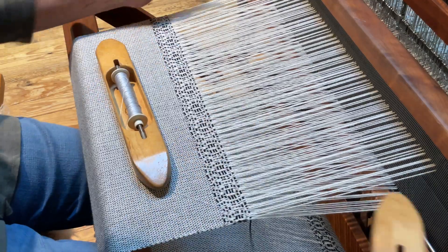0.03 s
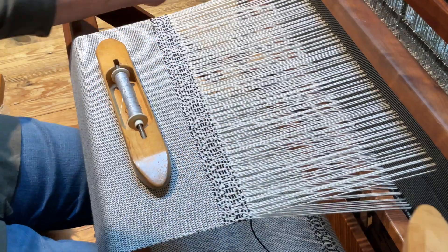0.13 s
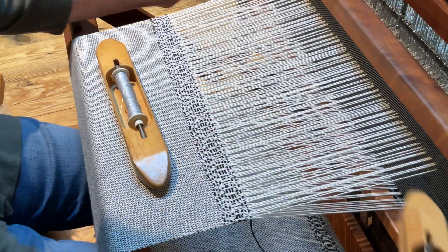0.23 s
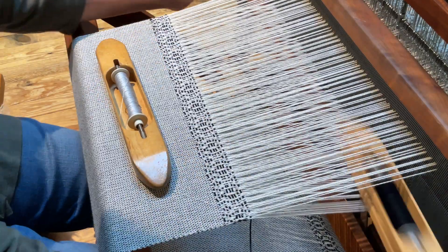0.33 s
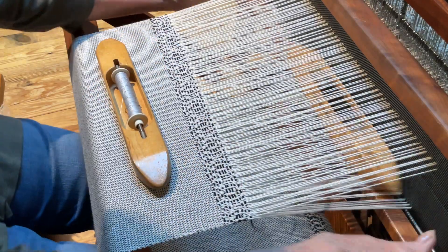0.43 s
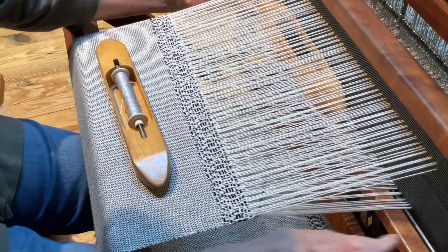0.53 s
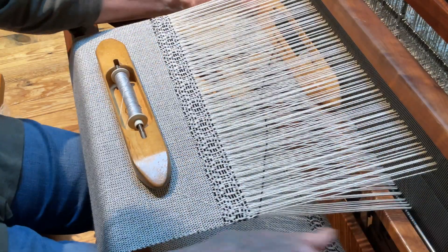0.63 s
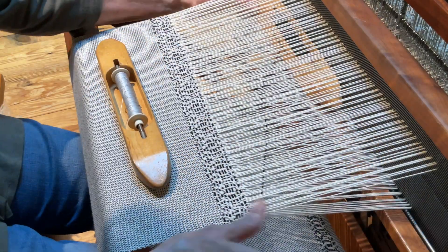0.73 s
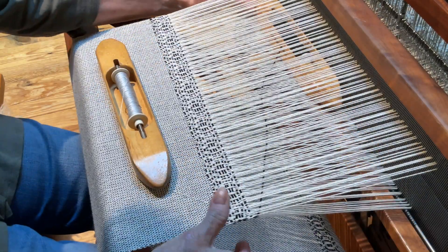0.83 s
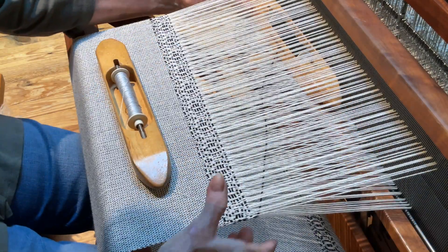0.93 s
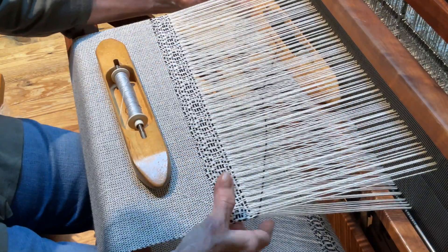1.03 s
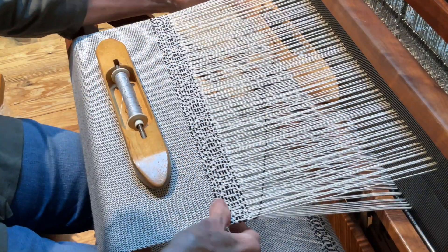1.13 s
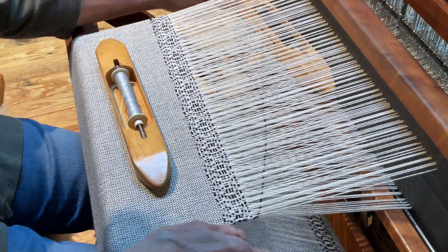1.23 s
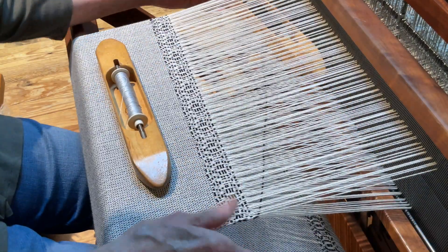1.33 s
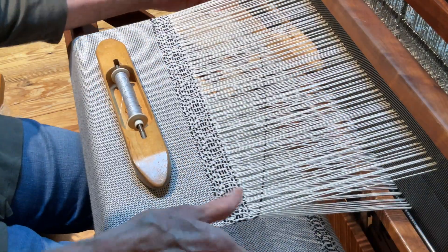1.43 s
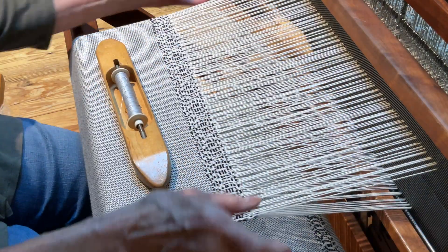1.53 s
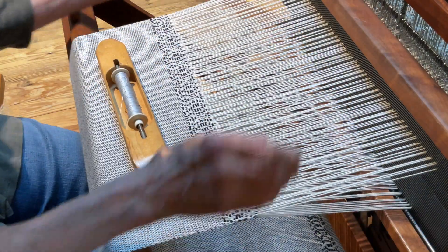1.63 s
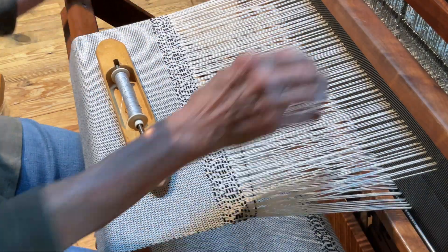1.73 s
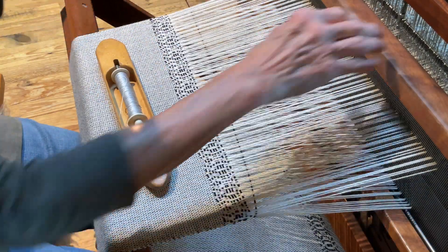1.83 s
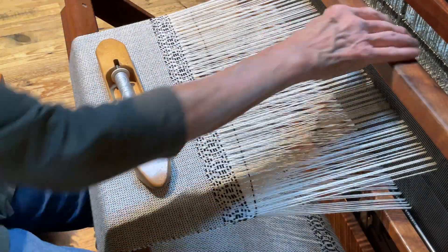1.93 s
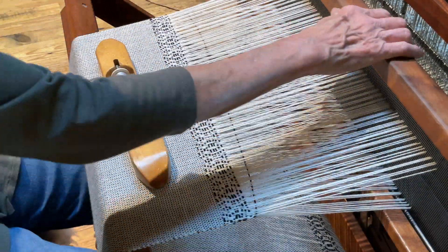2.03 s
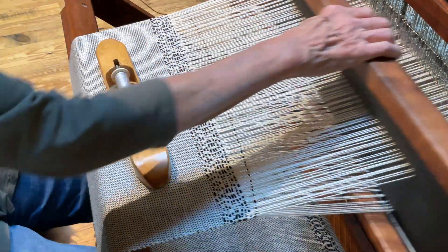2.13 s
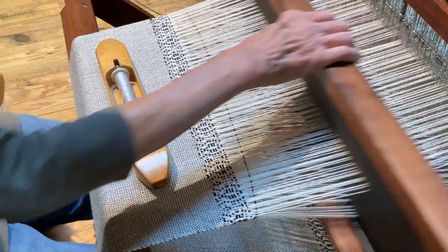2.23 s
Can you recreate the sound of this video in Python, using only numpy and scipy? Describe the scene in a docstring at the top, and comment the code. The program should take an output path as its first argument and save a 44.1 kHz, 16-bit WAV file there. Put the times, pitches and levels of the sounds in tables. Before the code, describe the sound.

Wooden shuttle knocks on a loom's metal reed, bobbin clacking, light taps, then a rattling scrape

```python
"""A wooden floor loom in a small room, heard from the weaver's bench over a faint room tone.
Yarn and cloth rustle (coloured noise), the frame thumps softly (low noise bursts) amid dull pitched thuds
(sines). A boat shuttle lands against the steel reed and skids along it (noise bursts ringing tuned modes), its
bobbin clacks, and it settles with light wooden taps. More rustling leads to the shuttle being drawn out along
the reed, whose wires tick and ring; yarn and cloth are left rustling."""
import sys
import numpy as np
from scipy import signal
from scipy.fft import rfft, irfft
from scipy.io import wavfile
from scipy.ndimage import map_coordinates

SR = 44100
rng = np.random.default_rng(int(sys.argv[2]) if len(sys.argv) > 2 else 0)


def transcribe(u):
    """Save the signal u as a 16-bit wav file named by the first command-line argument.

    u: samples, shape (n,) or (channels, n), limited to [-1, 1]; the rate is SR.
    q: integer samples, one column per channel.
    """
    v = np.clip(np.atleast_2d(u).T, -1, 1)
    q = np.round(v * 32767).astype(np.int16)
    wavfile.write(sys.argv[1], SR, q)


N = 101430  # length in samples
ATTACK_S = 0.00051  # time constant of a struck sound's rise


def amp(db):
    """Decibels to gain."""
    return 10 ** (np.asarray(db) / 20)


def unit(x):
    """Scale to rms 1."""
    return x / np.sqrt(np.mean(x ** 2) + 1e-20)


def along(points, hz):
    """Read (Hz, value) points at hz, on a log frequency axis."""
    point_hz, value = np.transpose(points)
    return np.interp(np.log(hz + 1), np.log(point_hz + 1), value)


def level(rows):
    """Gain per sample from (s, dB) points; -120 dB outside them unless they reach the scene's edge."""
    point_s, db = np.transpose(rows)
    before_db = db[0] if point_s[0] < .1 else -120
    after_db = db[-1] if point_s[-1] > 2.25 else -120
    return amp(np.interp(np.arange(N) / SR, point_s, db, left=before_db, right=after_db))


def swell(centre_s, width_s, db):
    """A smooth bell-shaped rise and fall, down to 1/e of its peak width_s either side of the centre."""
    return amp(db) * np.exp(-((np.arange(N) / SR - centre_s) / width_s) ** 2)


def coloured(x, spectrum):
    """Filter x by a (Hz, dB) curve, then scale to rms 1."""
    gain = amp(along(spectrum, np.fft.rfftfreq(len(x), 1 / SR)))
    return unit(irfft(rfft(x) * gain, len(x)))


def noise(spectrum, size):
    """Coloured noise of rms 1."""
    return coloured(rng.standard_normal(size), spectrum)


def shelf(x, hz, db, kind):
    """'high' shifts the treble above hz by db; 'low' shifts the bass by 1.5 db and the treble by 0.5 db."""
    f = np.fft.rfftfreq(2 * len(x), 1 / SR)
    above = f ** 4 / (f ** 4 + hz ** 4)
    weight = above if kind == 'high' else 1.5 - above
    return irfft(rfft(x, 2 * len(x)) * amp(db * weight))[:len(x)]


def fade(t60, rise=ATTACK_S, hold=0):
    """Half a second of a quick rise, a hold and an exponential decay."""
    t = np.arange(SR // 2) / SR
    decay = amp(-60 * np.maximum(t - hold, 0) / t60)
    return decay * (1 - np.exp(-t / rise))


def ring(modes, stretch=1, hold=0, detune=0.023, scatter_db=2):
    """Struck modes as decaying sines, slightly retuned and rebalanced at each strike."""
    t = np.arange(SR // 2) / SR
    out = 0
    for hz, db, t60 in modes:
        gain = amp(db + scatter_db * rng.normal())
        cycles = hz * (1 + detune * rng.normal()) * t + rng.random()
        out = out + gain * fade(t60 * stretch, hold=hold) * np.sin(2 * np.pi * cycles)
    return out / np.sqrt(sum(amp(db) ** 2 for _, db, _ in modes) / 2)


def add(track, start_s, x):
    """Mix x into the track at start_s."""
    part = track[round(start_s * SR):][:len(x)]
    part += x[:len(part)]


# colour of the room tone: [pitch_hz, level_db]
FLOOR_COLOUR = [(20, -27.5), (42, -13), (60, 5.5), (100, 1), (200, 1.5), (500, -7), (900, -17.5),
                (3000, -21.5), (10000, -35.5), (16000, -30)]


def room_tone(level_db=-78.5):
    """A steady, faint, mostly low noise."""
    return noise(FLOOR_COLOUR, N) * amp(level_db)


# rustle of warp threads and sleeve: [time_s, level_db]
RUSTLE_LEVEL = [(0, -60), (.1, -62.5), (.19, -72.5), (.45, -51.5), (.62, -48.5), (.74, -71), (.9, -83),
                (.96, -72.5), (1.02, -72), (1.11, -63.5), (1.22, -60.5), (1.3, -60), (1.4, -61.5),
                (1.5, -63.5), (2.12, -56), (2.22, -58), (2.3, -57)]
# its colour: [pitch_hz, level_db]
RUSTLE_COLOUR = [(150, -8.5), (500, -9.5), (900, -12.5), (1500, -2), (2300, -1), (3200, -2.5), (4700, 6),
                 (6500, -2.5), (9000, -6), (13000, -26.5), (15500, -20.5)]
# thin hiss of the weft yarn being drawn taut: [time_s, level_db]
YARN_LEVEL = [(0, -91), (.07, -67), (.18, -76), (.3, -97), (1.03, -95), (1.09, -69), (1.22, -60.5),
              (1.33, -68), (1.45, -76), (2.1, -76), (2.22, -63), (2.3, -56)]
# its colour: [pitch_hz, level_db]
YARN_COLOUR = [(2000, -34), (5000, -7.5), (8000, -3.5), (10500, -3.5), (13500, -4), (15500, -15)]
# one thread brushing the reed: centre_s, width_s, level_db
BRUSH = (1.305, 0.056, -57)
# its colour, with reed-like peaks: [pitch_hz, level_db]
BRUSH_COLOUR = [(200, -26), (500, -4), (900, -13), (1250, -10), (1420, -11), (1550, 6.5), (1750, -20),
                (2150, -27), (2350, 10.5), (2600, -6), (4000, -9), (4500, -17), (5200, -24), (12000, -33)]
# the sleeve swishing over the cloth: [centre_s, width_s, level_db]
SWISHES = [(1.22, 0.042, -69.5), (1.426, 0.034, -64), (1.66, 0.03, -57.5)]
# colour of the sleeve: [pitch_hz, level_db]
SLEEVE_COLOUR = [(100, -21), (200, -1), (350, -5), (520, -3.5), (800, -29), (1400, -5), (3000, -27),
                 (10000, -37)]


def rustle(grain_db=2.0, grains_per_s=160):
    """Rubbing threads are noise with a fine random flutter in level; sleeve swishes are smooth swells."""
    grain = map_coordinates(rng.standard_normal(N), [np.arange(N) / SR * grains_per_s], order=1)
    threads = noise(RUSTLE_COLOUR, N) * level(RUSTLE_LEVEL)
    threads += noise(YARN_COLOUR, N) * level(YARN_LEVEL)
    threads += noise(BRUSH_COLOUR, N) * swell(*BRUSH)
    swishes = noise(SLEEVE_COLOUR, N) * sum(swell(*row) for row in SWISHES)
    return unit(amp(grain_db * grain)) * threads + swishes


# soft thumps of the wooden frame: [start_s, level_db, t60_s]
THUMPS = [(0.059, -76, .4), (.235, -62, 0.46), (0.332, -46, 0.35), (0.382, -56.5, 0.84), (.45, -56, .5),
          (0.524, -56.5, 0.47), (0.661, -67, 0.27), (1.161, -64.5, 0.27), (1.446, -57, 0.28),
          (1.75, -68, 0.43), (2.021, -71, 0.21)]
# colour of the thumps: [pitch_hz, level_db]
FRAME_COLOUR = [(25, -25.5), (45, -8.5), (60, 3), (90, 0.5), (130, 1), (175, -11), (260, -16), (480, -19),
                (800, -35.5), (2000, -60)]


def frame_thumps():
    """The heavy frame rumbles in low noise bursts."""
    out = np.zeros(N)
    for start_s, db, t60 in THUMPS:
        add(out, start_s, amp(db) * noise(FRAME_COLOUR, SR // 2) * fade(t60, rise=0.004))
    return out


# dull pitched thuds: the frame, a hand on the cloth (1.445 s), a low scuff (1.638 s):
# [start_s, pitch_hz, level_db, t60_s]
THUDS = [(0.218, 164, -57.5, .3), (0.446, 120.9, -47.5, 0.31), (0.942, 59, -67, 0.55),
         (1.445, 128, -52.5, 0.31), (1.638, 390, -53, 0.089)]


def thuds():
    """Dull pitched thuds of the frame, a hand on the cloth and a low scuff, each one decaying sine."""
    out = np.zeros(N)
    t = np.arange(SR // 2) / SR
    for start_s, hz, db, t60 in THUDS:
        add(out, start_s, amp(db) * np.sin(2 * np.pi * hz * t) * fade(t60, rise=0.0022))
    return out


# modes of the steel reed, also rung by the knocks: [pitch_hz, level_db, t60_s]
REED_MODES = [(1241, -4, 0.077), (1298.2, -8, 0.13), (1543, -13, 0.054), (2138, -4, 0.039),
              (2257.5, 3, 0.061), (2386, -4.5, .14), (2604, -10.5, 0.11), (2950, -1.5, 0.036),
              (3019, -3, 0.044), (3586, 1.5, 0.032), (4493, -1, 0.034), (5650, -6.5, 0.033),
              (6670, -7.5, .03), (7720, -7.5, 0.033), (9820, -13.5, 0.042)]


def reed_answer(force):
    """The reed's resonances, driven by a force; longer-ringing modes are narrower."""
    f = np.fft.rfftfreq(2 * N, 1 / SR)
    body = 0
    for k, (hz, db, t60) in enumerate(REED_MODES):
        width_hz = np.log(1000) / (np.pi * t60)
        damping = 1j * f * width_hz
        # alternate signs vary how neighbouring modes add
        body = body + (-1) ** k * amp(db) * t60 * damping / (hz * hz - f * f + damping)
    body = body / np.sqrt(np.mean(np.abs(body) ** 2))
    return irfft(rfft(force, 2 * N) * body)[:N]


WIRES_PER_S, WIRE_SCATTER_DB = 380, 2.5  # average rate of wire slips, spread of their strengths
SLIP_S = 0.00093  # time constant of a slip's energy


def scrape(effort, spectrum, wires_db, grit_db):
    """The shuttle slips over one wire after another; each slip is a tiny burst that rings the reed."""
    count = int(WIRES_PER_S * N / SR)
    energy = amp(WIRE_SCATTER_DB * rng.standard_normal(count)) ** 2
    slips = np.bincount(rng.integers(0, N, count), energy, N)
    decaying = signal.lfilter([1], [1, -np.exp(-1 / (SLIP_S * SR))], slips)
    grit = unit(np.sqrt(np.abs(decaying)) * rng.standard_normal(N))
    dry_grit = amp(grit_db) * coloured(grit, spectrum) * effort
    return dry_grit + amp(wires_db) * reed_answer(grit * effort)


# how hard the shuttle scrapes as it is thrown in: [time_s, level_db]
THROW_EFFORT = [(.215, -80), (.222, -28), (.27, -33), (.305, -32.5), (.35, -47.5), (.44, -44.5),
                (.5, -52.5), (.55, -47.5), (.595, -48), (.64, -52), (.72, -66), (.8, -82)]
# colour of that scrape: [pitch_hz, level_db]
THROW_COLOUR = [(100, -29), (450, -6), (800, -11.5), (1500, -8.5), (2100, 0.5), (2650, 10), (3200, -6),
                (5200, -5.5), (7500, -16.5), (12000, -26.5), (15500, -32.5)]


def throw():
    """The thrown shuttle skids along the reed, its grit mixed above the ringing wires."""
    return scrape(level(THROW_EFFORT), THROW_COLOUR, wires_db=-8.5, grit_db=-2)


# the shuttle knocks on the reed; bass_db is the shelf setting and t60_s the crack's decay:
# [start_s, level_db, treble_db, bass_db, t60_s]
KNOCKS = [(0.2168, -27, -9, 15, 0.024), (.2232, -32, 1, 5, .025), (0.2557, -24, -15.5, 1.5, 0.016),
          (0.2747, -19, -15.5, -50, .025), (0.3189, -21, -15, 12, .025), (0.3709, -18, -5.5, -3.5, 0.033),
          (0.4234, -22, 6.5, 5.5, 0.047), (0.4761, -30.5, -3, 1, 0.033), (0.5711, -23.5, -14, 0, 0.014),
          (0.5802, -32, -0.5, 1.5, 0.022), (.783, -38, -17.5, 0.5, 0.051), (1.5005, -22.5, -11.5, 2, 0.03),
          (1.5585, -17.5, -4.5, -7.5, 0.042), (1.5843, -31.5, 10, -8, 0.023),
          (1.605, -29.5, -17, -6, 0.017), (1.615, -27, 7, -17, 0.056), (1.621, -24.5, -4.5, -12, 0.019),
          (1.6385, -28.5, 3.5, 6.5, 0.031), (1.653, -23, 0, -5, .022), (1.671, -25, -20, 1, 0.021),
          (1.679, -28.5, -0.5, -2, 0.018), (1.6963, -23, -1, -16, 0.025), (1.705, -25, -1, -12, 0.023),
          (1.7159, -26, -8, 0, 0.027), (1.7489, -22, 0.5, -14.5, 0.037), (1.772, -28.5, 13.5, -10, 0.037),
          (1.7932, -28.5, -2, -15, .02), (1.8185, -34.5, -3.5, 3.5, 0.022),
          (1.8496, -28.5, 10, -4.5, 0.042), (1.9222, -26.5, -2.5, -9, 0.021), (1.9419, -22, 14, -9, 0.026),
          (1.959, -39, 5.5, 4, 0.11), (1.991, -28, -29, -7, 0.019), (2.0008, -34, -7, 9, 0.024),
          (2.015, -34, 0.5, 3.5, 0.037), (2.033, -32.5, -4.5, -12, 0.019), (2.0456, -23, -3.5, 2.5, 0.0255),
          (2.056, -27.5, -10, -15, 0.066)]
# contact noise, shared with the taps: [pitch_hz, level_db]
CRACK_COLOUR = [(100, -18.5), (400, -18), (800, -21), (1300, 1.5), (2400, 1), (4500, 7), (7000, 3.5),
                (12000, -5), (15500, -21.5)]
# the shuttle bumps the wooden beater: [start_s, level_db]
BUMPS = [(0.2174, -33), (0.3192, -32.5), (0.3717, -19.5), (0.4239, -35), (0.5734, -39), (1.501, -38),
         (1.9415, -45)]
# modes of the beater: [pitch_hz, level_db, t60_s]
BEATER_MODES = [(274.7, -23.5, 0.017), (390, -15, 0.024), (490.8, -13, 0.075), (745, -6, 0.011),
                (1026, -1.5, 0.015), (1395, 4, 0.029), (1965, 1, 0.016), (2370, -3, .012)]
TREBLE_HZ, BASS_HZ = 5500, 1170  # shelf corners
KNOCK_CRACK_DB, REED_DB = -4.5, -4  # mix of contact noise and reed ring


def knocks():
    """Wood meets the reed with a crack and the ring of the wires; bumps sound the wooden beater."""
    out = np.zeros(N)
    for start_s, db, treble_db, bass_db, t60 in KNOCKS:
        contact = shelf(noise(CRACK_COLOUR, SR // 2), BASS_HZ, bass_db, 'low')
        crack = amp(KNOCK_CRACK_DB) * contact * fade(t60)
        wires = amp(REED_DB) * ring(REED_MODES, detune=.011)
        add(out, start_s, amp(db) * shelf(crack + wires, TREBLE_HZ, treble_db, 'high'))
    for start_s, db in BUMPS:
        add(out, start_s, amp(db) * ring(BEATER_MODES, hold=0.00052))
    return out


# the bobbin clacks on its spindle; noise_db lifts the crack alone, length_s scales all decays:
# [start_s, level_db, treble_db, noise_db, length_s]
CLACKS = [(0.3209, -24.5, 4, 1.5, 0.022), (.3771, -16, 2, -3.5, 0.015), (.3945, -18.5, -3, -8, 0.015),
          (.4235, -26, -7, 9, 0.022), (.4315, -24.5, 0.5, 1, 0.023)]
# contact noise of a clack: [pitch_hz, level_db]
CLACK_COLOUR = [(200, -17), (1200, -11), (3000, -7), (6000, -5.5), (11000, -3), (13000, -1.5), (15500, -22)]
# modes of bobbin and spindle: [pitch_hz, level_db, decay as a multiple of length_s]
BOBBIN_MODES = [(2347, -4, 0.86), (3496, -1.5, 1.6), (4930, -14, 1.1), (5534, -5, 2.1), (5694, 1.5, 1.7),
                (6055, -4.5, 1.8), (6460, -13.5, 0.9), (7850, -7, 1.3), (8720, -5.5, 1.1),
                (9260, -8.5, 1.9), (10700, -3, 0.7), (12140, -10.5, 0.77)]
CLACK_CRACK_DB, BOBBIN_DB = -4.5, -1.5  # mix of contact noise and ring
CHATTER_S = 0.0036  # a clack sustains this long before it dies away


def bobbin():
    """The loose bobbin clacks on its spindle: bright noise and ringing modes, briefly held."""
    out = np.zeros(N)
    for start_s, db, treble_db, noise_db, length_s in CLACKS:
        contact = noise(CLACK_COLOUR, SR // 2) * fade(1.1 * length_s, hold=CHATTER_S)
        crack = amp(CLACK_CRACK_DB + noise_db) * contact
        body = amp(BOBBIN_DB) * ring(BOBBIN_MODES, length_s, CHATTER_S, detune=0.0065)
        add(out, start_s, amp(db) * shelf(crack + body, 7000, treble_db, 'high'))
    return out


# the shuttle's light wooden taps as it settles: [start_s, level_db]
TAPS = [(.519, -35.5), (.5575, -28), (0.5718, -18), (0.578, -21.5), (.604, -29.5), (0.6591, -37),
        (0.6817, -39.5), (.689, -46), (0.7756, -37), (0.7841, -37.5), (1.102, -49), (1.2, -47), (1.31, -51),
        (1.365, -52), (1.472, -48), (1.492, -41)]
# modes of the shuttle's shell: [pitch_hz, level_db, t60_s]
SHELL_MODES = [(2330, -12, .05), (3686, -13.5, 0.029), (4376, -4, .018), (4674, -6.5, 0.027),
               (4860, -1, 0.011), (5410, -7.5, 0.012), (6250, -12, 0.02), (8800, -12, 0.0074)]


def taps(crack_db=-10.5):
    """The hollow shuttle rocks to rest: each tap rings its shell under a short contact noise."""
    out = np.zeros(N)
    for start_s, db in TAPS:
        shell = ring(SHELL_MODES)
        crack = amp(crack_db) * noise(CRACK_COLOUR, SR // 2) * fade(0.0082)
        add(out, start_s, amp(db) * (shell + crack))
    return out


# how hard the shuttle scrapes as it is drawn out: [time_s, level_db]
DRAW_EFFORT = [(1.42, -75), (1.495, -46.5), (1.52, -35.5), (1.6, -42), (1.69, -35), (1.74, -40.5),
               (1.81, -37), (1.9, -45), (1.97, -43), (2.07, -44.5), (2.11, -53), (2.2, -68)]
# colour of that scrape: [pitch_hz, level_db]
DRAW_COLOUR = [(100, -26), (450, -10.5), (800, -44), (1250, 7), (1750, -1), (2400, -2.5), (4600, 6),
               (6000, -3.5), (9500, -12), (13000, -29), (15500, -29.5)]


def draw():
    """The shuttle is drawn out along the reed, its ringing wires mixed above the grit."""
    return scrape(level(DRAW_EFFORT), DRAW_COLOUR, wires_db=-2.0, grit_db=-4)


# decay of the room's tail: [pitch_hz, t60_s]
ROOM_DECAY = [(100, 0.98), (500, 0.88), (1300, 0.55), (2400, 0.53), (5000, 0.36), (9000, 0.31),
              (15000, 0.28)]
WALLS_T60_S = .06  # decay of the quick reflections
WALLS_DB, TAIL_DB = -12, -11  # before the wet level of each source


def echo(x, response, delay_s):
    """Delay x and spread it over a response of unit energy."""
    delayed = np.pad(x, (round(delay_s * SR), 0))
    return signal.fftconvolve(delayed, response / np.linalg.norm(response))[:N]


def room(x, wet_db):
    """Quick reflections from the loom and floor, then the room's tail, whose treble dies first."""
    hz, t, z = signal.stft(rng.standard_normal(SR), SR, nperseg=256)
    decay = amp(-60 * t / along(ROOM_DECAY, hz)[:, None])
    tail = signal.istft(z * decay, SR, nperseg=256)[1]
    walls = rng.standard_normal(SR // 2) * fade(WALLS_T60_S, rise=0.011)
    wet = amp(WALLS_DB) * echo(x, walls, .003) + amp(TAIL_DB) * echo(x, tail, .009)
    return x + amp(wet_db) * wet


def scene():
    """The loom in its room, over a faint room tone; the shuttle is nearer and drier than the wide reed."""
    background = room_tone() + rustle() + frame_thumps() + thuds()
    reed = room(throw() + knocks() + draw(), wet_db=0.0)
    shuttle = room(bobbin(), wet_db=-3.5) + room(taps(), wet_db=-2.5)
    return (background + reed + shuttle)[None]


LOW_CUT_HZ, TOP_HZ = 58, 15900  # half gain in the bass, band limit


def record(dry):
    """The microphone drops the deepest bass; nothing is kept above the band limit."""
    f = np.fft.rfftfreq(2 * N, 1 / SR)
    low_cut = f ** 5 / (f ** 5 + LOW_CUT_HZ ** 5)
    return irfft(rfft(dry, 2 * N) * low_cut * (f < TOP_HZ))[..., :N]


dry = scene()
out = record(dry)
transcribe(out)
```